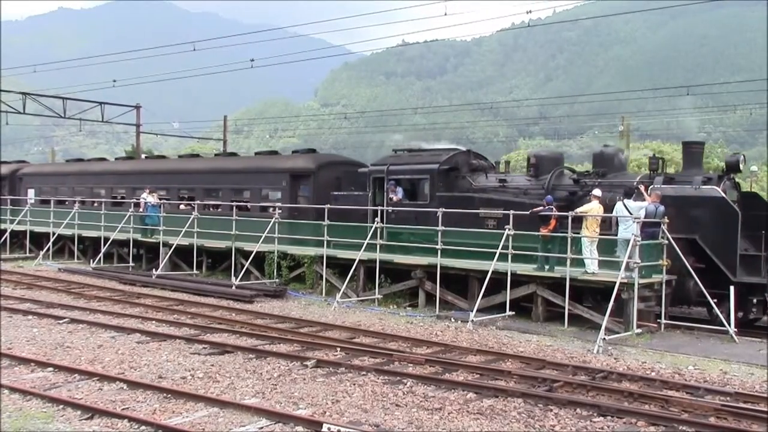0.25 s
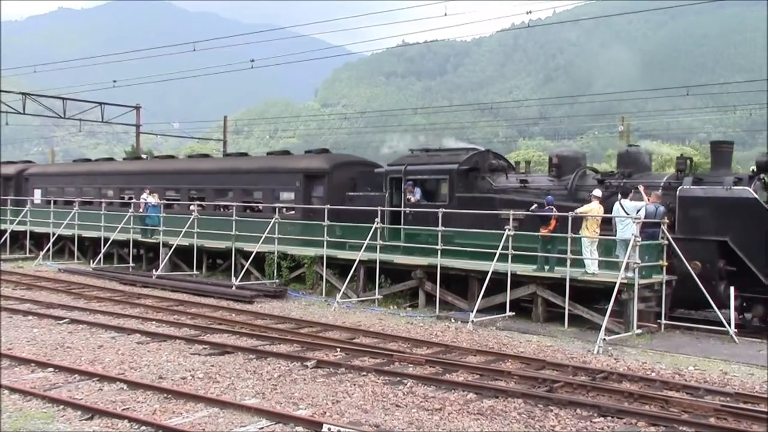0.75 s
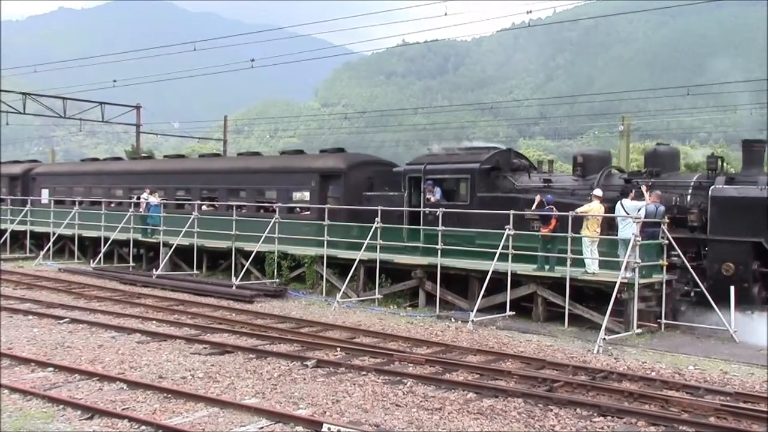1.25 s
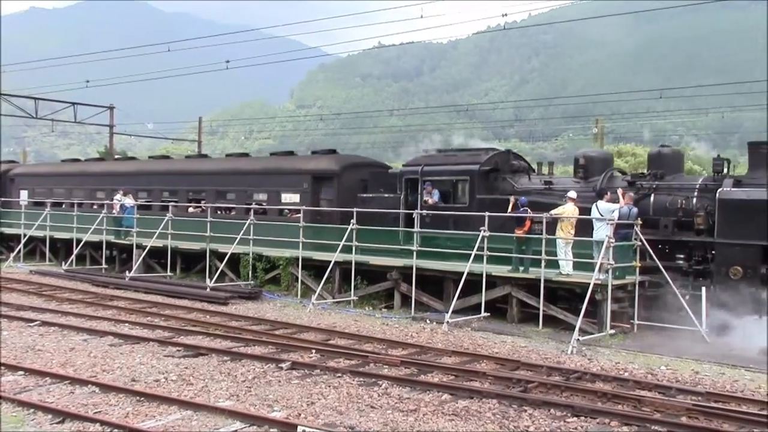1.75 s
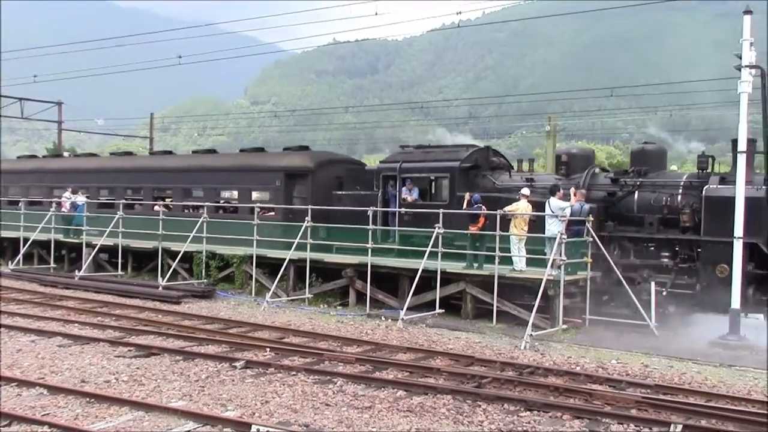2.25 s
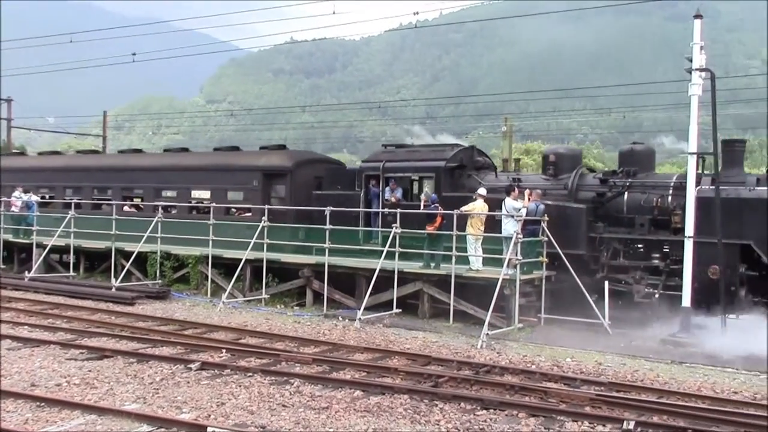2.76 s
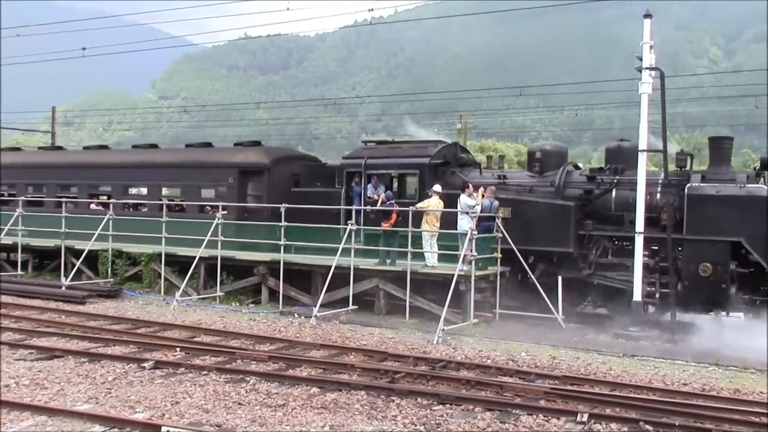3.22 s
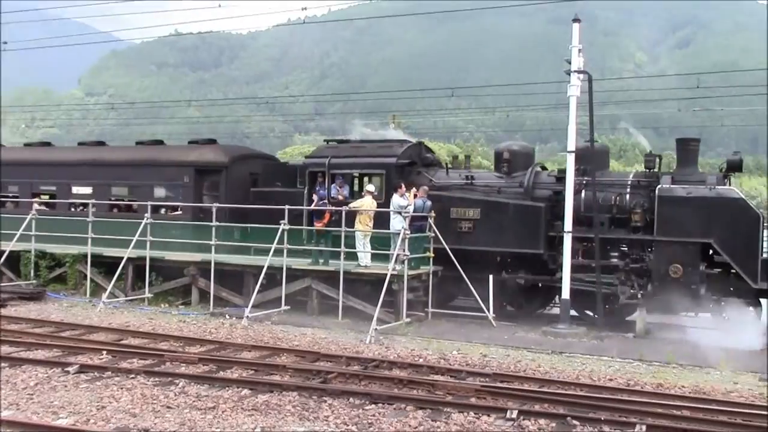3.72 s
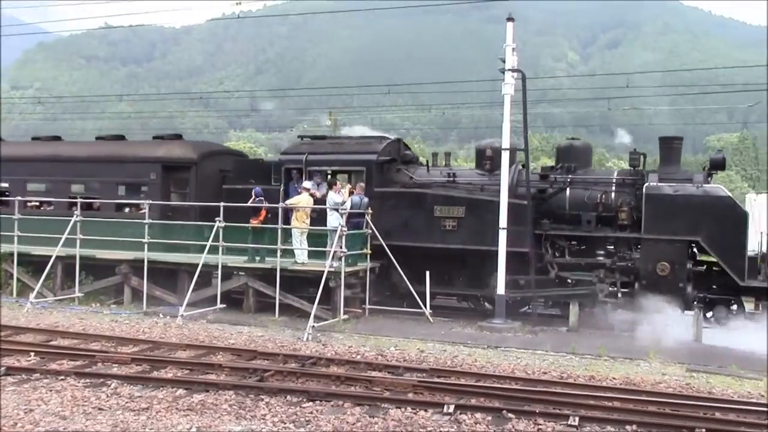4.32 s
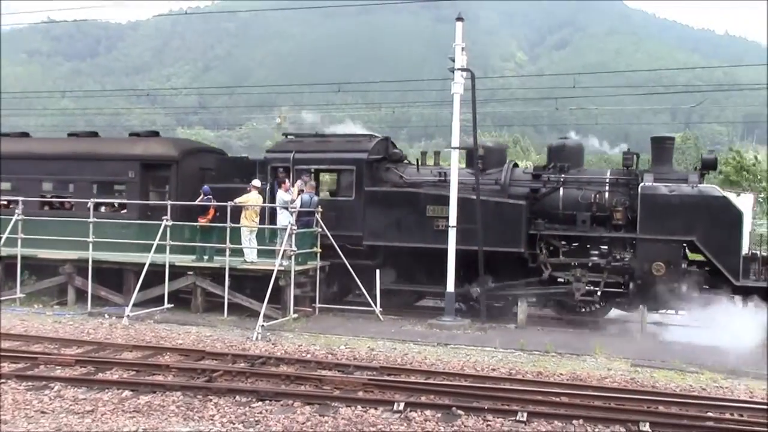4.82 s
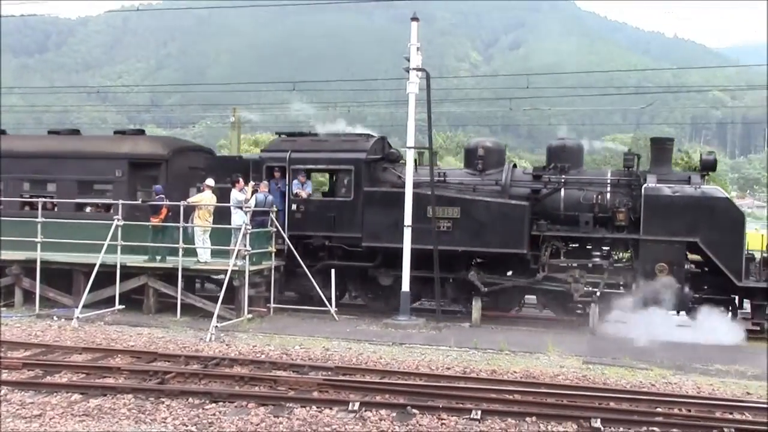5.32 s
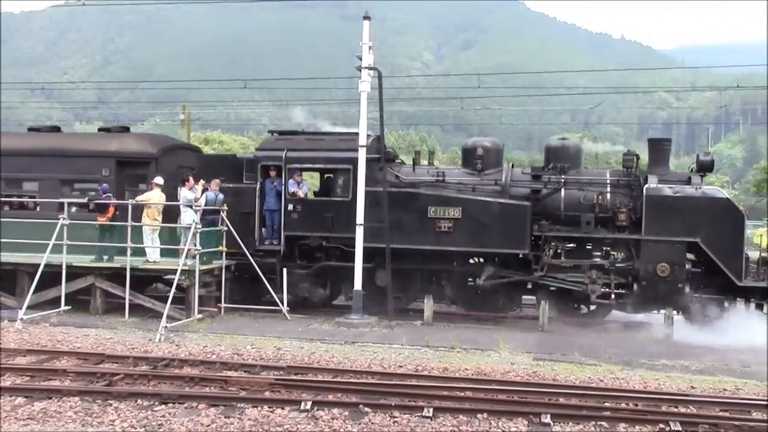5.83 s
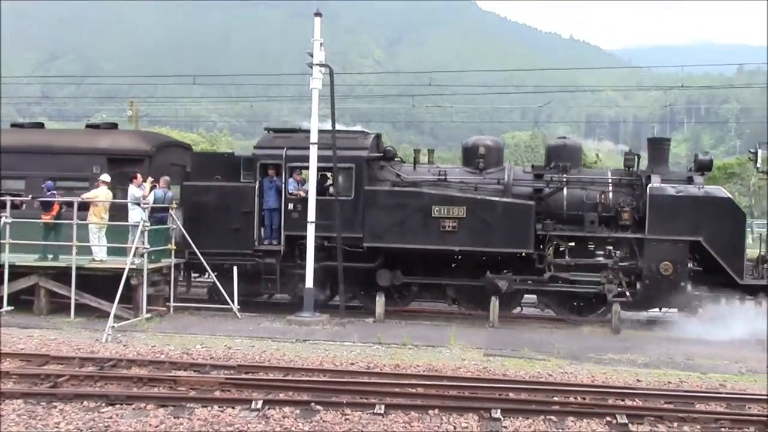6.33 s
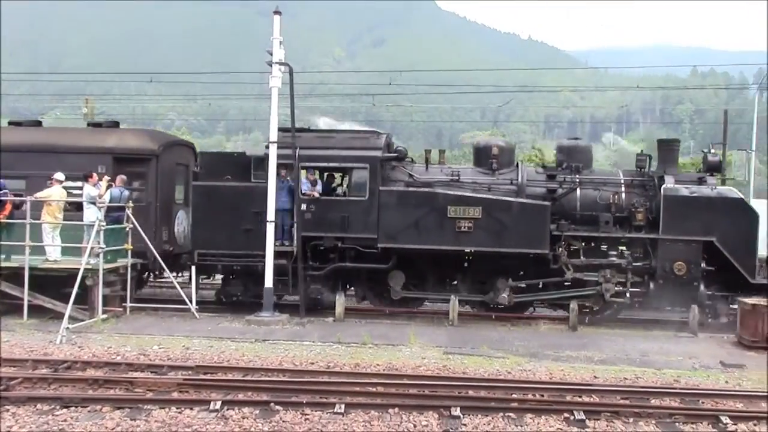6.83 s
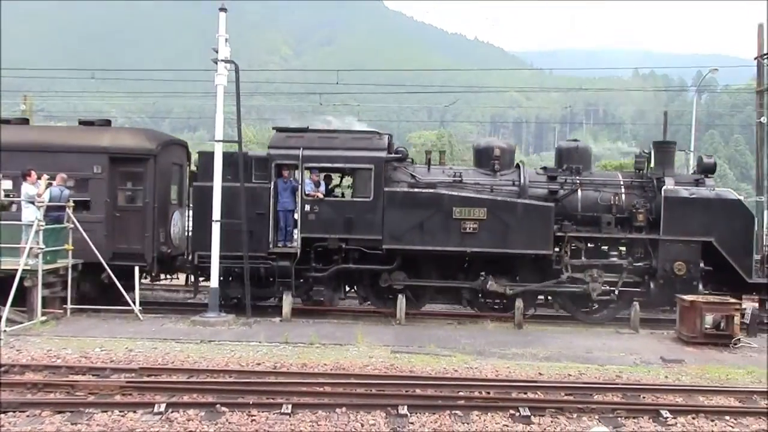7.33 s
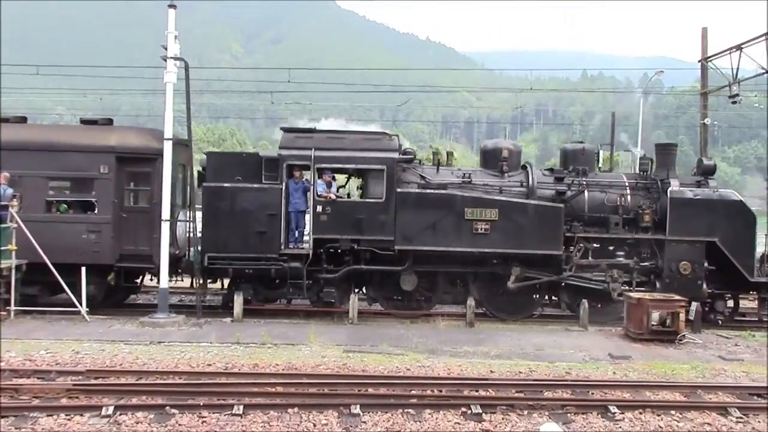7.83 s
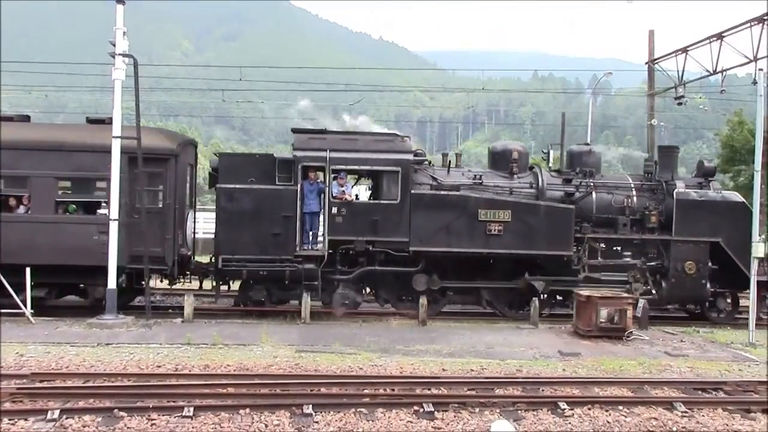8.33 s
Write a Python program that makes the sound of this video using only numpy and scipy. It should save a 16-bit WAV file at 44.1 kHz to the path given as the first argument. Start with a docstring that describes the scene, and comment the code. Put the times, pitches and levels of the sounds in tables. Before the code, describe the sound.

Lumpy, fluttering gusts hit an unprotected stereo microphone for the first second or so, with sizzling high steam behind. Bright steam jets suddenly burst out and dominate for five seconds, surging slowly and sputtering as water is thrown out, with close reflections colouring the hiss. They stop sharply with a spit. Loose running gear knocks and squeaks softly over low rumble, the leak rises again, and wind returns.

```python
"""A steam locomotive pulls slowly out of a station. First hard gusts of wind buffet the microphone, as shaped
noise, over a thin leak of high noise and the rumble of the wheels. Then the open drain cocks blow: four bands
of noise hiss with every piston stroke and roar while they throw out water, and the leak sinks. The cocks shut
with a last spit; the leak comes back with a faint sine whistle, and the running gear clanks as damped partials
and squeaks as wavering sines. Near the end the wind gusts again."""
import sys
import numpy as np
from scipy import signal
from scipy.fft import rfft, irfft, next_fast_len
from scipy.io import wavfile
from scipy.ndimage import uniform_filter1d, map_coordinates

SR = 44100
rng = np.random.default_rng(int(sys.argv[2]) if len(sys.argv) > 2 else 0)


def int16_out(signal):
    """Quantize to a 16-bit WAV file."""
    q = np.round(np.clip(np.atleast_2d(signal).T, -1, 1) * 32767)
    wavfile.write(sys.argv[1], SR, q.astype(np.int16))


N = 377937


def amp(db):
    """Decibels to gain."""
    return 10 ** (np.asarray(db) / 20)


def unit(x):
    """Scaled to rms 1."""
    return x / np.sqrt(np.mean(x ** 2) + 1e-20)


def along(points, hz):
    """A curve through (f/Hz, value) points, on a log frequency axis."""
    f, v = np.transpose(points)
    return np.interp(np.log(hz + 1), np.log(f + 1), v)


def clock():
    """The time of every sample, in seconds."""
    return np.arange(N) / SR


def curves(rows):
    """One value per sample for each column after the time."""
    s, *cols = np.transpose(rows)
    return [np.interp(clock(), s, c) for c in cols]


def gate(start, end, edge):
    """Open from start to end, with soft edges."""
    return (np.tanh((clock() - start) / edge) - np.tanh((clock() - end) / edge)) / 2


def swell(start, rise, hold, fall):
    """Rises from start, holds until start + hold, then dies away."""
    age = clock() - start
    return np.clip(age / rise, 0, 1) * np.exp(-np.maximum(age - hold, 0) / fall)


def wobble(rate):
    """A smooth random curve, rate knots a second."""
    return map_coordinates(rng.standard_normal(int(N * rate / SR) + 4), [clock() * rate])


def filtered(x, response):
    """x times a response of frequency."""
    m = next_fast_len(N + 8192)
    return irfft(rfft(x, m) * response(np.fft.rfftfreq(m, 1 / SR)), m)[..., :N]


def drone(spectrum):
    """Noise of rms 1, the same in both ears."""
    return unit(filtered(rng.standard_normal(N), lambda hz: amp(along(spectrum, hz))))


# stereo width given to the hiss, centred below about 5 kHz and wider in the treble, before any change of width:
# (f/Hz, side against middle level/dB)
WIDTH = [(4500, -90), (5300, -9.5), (6200, -19), (8000, -16), (10000, -12), (13500, -4.5), (15500, -20)]


def rush(spectrum, patchy_db, width_db=0):
    """Turbulent stereo noise of rms 1: eddies lift and drop patches of the spectrum."""
    z = signal.stft(rng.standard_normal((2, N)), nperseg=512)[2]
    field = rng.standard_normal(z.shape[1:])
    field = uniform_filter1d(field, size=9, axis=0)  # smooth across frequency
    field = uniform_filter1d(field, size=14, axis=1)  # smooth across time
    pair = signal.istft(z * amp(patchy_db * unit(field)), nperseg=512)[1][:, :N]

    def middle_and_side(hz):
        middle_db = along(spectrum, hz)
        return amp([middle_db, middle_db + along(WIDTH, hz) + width_db])

    mid, side = filtered(pair, middle_and_side)
    return unit(np.array([mid + side, mid - side]))


# hard gusts: (start t/s, end t/s, edge t/s, buffet level/dB, flutter level/dB)
GUSTS = [(-.02, 0.128, .016, -13.5, -12.5), (0.165, 0.203, 0.0089, -14.5, -20.5),
         (0.223, 0.284, 0.019, -18, -25.5), (0.324, 0.608, .015, -18.5, -28),
         (0.401, 0.483, 0.0071, -23, -20), (0.57, 0.59, .006, -12.5, -13), (0.775, 0.836, 0.011, -18, -30),
         (0.798, 1.242, 0.0085, -22, -37), (1.047, 1.135, .015, -16, -29), (8.17, 8.56, .06, -26, -26.5),
         (8.308, 8.423, 0.07, -20, -15.5)]
# light air on the microphone, before trim: (t/s, buffet level/dB)
BREEZE = [(1.25, -32), (1.29, -27), (1.61, -49.5), (1.79, -36), (2.23, -29.5), (2.4, -41.5), (2.44, -55),
          (2.57, -36.5), (2.84, -47), (3.34, -49), (3.54, -39), (4.09, -40.5), (4.44, -49.5), (4.96, -50.5),
          (5.11, -39.5), (5.15, -45.5), (5.49, -44), (6.09, -56), (6.13, -39), (6.36, -55.5), (6.67, -58),
          (6.71, -48), (6.84, -42.5), (7.13, -60.5), (7.3, -33), (7.36, -42.5), (7.71, -42.5),
          (7.82, -33.5), (7.9, -38), (8.15, -30)]
# single strong eddies slap the microphone: (start t/s, buffet level/dB)
SLAPS = [(.364, -18), (.407, -16.5), (.431, -12), (.526, -10), (.884, -19), (1.16, -17), (1.181, -15)]
# wind noise colours, relative: (f/Hz, level/dB per Hz)
BUFFET = [(25, -46), (60, -49), (100, -26), (160, -9.5), (240, -1), (360, 3.5), (550, 2), (750, -2),
          (1100, -11.5), (2000, -31), (4000, -70)]
FLUTTER = [(200, -53), (450, 0), (750, -1), (1050, -2), (1500, -6), (2200, -11.5), (3200, -19), (6000, -34)]
TEARING = [(500, -35), (1000, -2), (1600, 3), (2400, 4), (3200, -7), (5000, -33)]
LULL_DB = -34.5  # buffet between the first gusts
BREEZE_DB, BREEZE_FROM_S = 0.5, 1.22  # trim of the light air, and when it takes over from the lull
SLAP_FLUTTER_DB = -9.5  # flutter against buffet in a slap


def wind():
    """Eddies hit the microphone in lumps; hard gusts break into sharp flutter."""
    t = clock()
    buffet = np.where(t < BREEZE_FROM_S, amp(LULL_DB), amp(curves(BREEZE)[0] + BREEZE_DB))
    flutter = np.zeros(N)
    for start, end, edge, gust_db, flutter_db in GUSTS:
        blowing = gate(start, end, edge)
        buffet = np.hypot(buffet, amp(gust_db) * blowing)
        flutter = np.hypot(flutter, amp(flutter_db) * blowing)
    eddies = 0.43 * wobble(75) + 0.83 * wobble(190)
    # lumps deepen as the wind grows, then merge into one roar in the hardest gusts
    depth_db = np.interp(20 * np.log10(buffet), [-40, -22, -13], [2.1, 3.1, 1.5])
    push = buffet * unit(amp(depth_db * eddies))
    crackle = flutter * unit(amp(0.92 * depth_db * eddies + 2.0 * wobble(500)))
    age = t[:SR // 20]
    slap = age / 0.0038 * np.exp(1 - age / 0.0034)
    for s, db in SLAPS:
        first = round(s * SR)
        at = slice(first, first + len(age))
        push[at] += amp(db) * slap
        crackle[at] += amp(db + SLAP_FLUTTER_DB) * slap
    # hard gusts also tear at each port separately, and brighter
    tearing = amp(-10.5) * flutter * np.array([drone(TEARING), drone(TEARING)])
    return push * drone(BUFFET) + crackle * (drone(FLUTTER) + tearing)


# the uneven leak, heard before and after the jets, before trim:
# two lists of (t/s, hiss level/dB, fizz level/dB)
LEAK = [
    [(0.0, -24, -24), (0.038, -28.5, -30), (0.142, -26, -21.5), (0.232, -26, -26), (0.444, -21, -18),
     (0.664, -22, -20), (0.734, -18.5, -16), (1.134, -27, -26), (1.25, -20, -23.5)],
    [(6.55, -49, -49), (7.07, -48, -37), (7.22, -36, -34.5), (7.6, -32.5, -29.5), (7.7, -33, -33),
     (7.79, -28.5, -25), (7.85, -31.5, -31), (7.93, -29, -26.5), (8.57, -26.5, -25.5)],
]
# the leak's thin whistle: (t/s, level/dB)
WHISTLE = [(6.5, -60), (6.85, -53), (7.13, -47.5), (7.34, -46.5), (7.5, -51), (8.57, -53)]
# leak noise colours, relative: (f/Hz, level/dB per Hz)
LEAK_HISS = [(900, -19), (1800, -12), (2800, -4.5), (3300, -3.5), (3650, -1), (4100, -4.5), (5000, -7.5),
             (5700, -1), (6400, 1), (8200, 1), (9500, -8), (12000, -33)]
LEAK_FIZZ = [(7000, -30), (9000, -2.5), (10000, 0), (11000, -2.5), (12300, -6), (13500, -12),
             (16000, -16.5)]
LEAK_HISS_DB, LEAK_FIZZ_DB = 0.5, 1.5  # trim of its two parts
LEAK_LEAST_DB = -38.5  # floor under each part, before the wobble and the jets' dip


def leak():
    """A thin, high hiss from the engine's valves, which drops while the cocks blow; a gap in it whistles."""
    hiss_db, fizz_db = curves(np.vstack(LEAK))
    whistle_db, = curves(WHISTLE)
    least = amp(LEAK_LEAST_DB)
    hiss_gain = np.hypot(amp(hiss_db + LEAK_HISS_DB), least)
    fizz_gain = np.hypot(amp(fizz_db + LEAK_FIZZ_DB), least) * amp(1.2 * wobble(25))
    hiss = hiss_gain * rush(LEAK_HISS, patchy_db=1, width_db=-37)
    fizz = fizz_gain * rush(LEAK_FIZZ, patchy_db=1.3, width_db=-8.5)
    pitch_hz = 3620 * (1 + .006 * wobble(200))
    whistle = unit(np.sin(2 * np.pi * np.cumsum(pitch_hz) / SR) * amp(2 * wobble(90)))
    dip = 1 - 0.95 * gate(1.29, 6.45, .02)
    return amp(0.72 * wobble(18)) * (hiss + fizz) * dip + amp(whistle_db) * whistle


# rumble colour, relative: (f/Hz, level/dB per Hz)
WHEELS = [(25, -40), (70, -26), (120, -9.5), (250, -12), (450, -9), (900, 3), (1500, 6), (2500, 3),
          (5000, -9.5)]
# short squeaks of the rods: (t/s, length t/s, f/Hz, level/dB)
SQUEAKS = [(0.465, 0.022, 1600, -22), (7.285, 0.07, 1695, -41), (7.33, 0.04, 1960, -38),
           (7.76, .03, 2150, -36)]
# knocks of the running gear: (t/s, level/dB, t60 t/s)
CLANKS = [(6.715, -41.5, 0.35), (7.005, -37.5, 0.24), (7.225, -37.5, 0.65), (7.29, -39, 0.4),
          (7.765, -31.5, 0.31), (7.81, -32.5, 0.19), (8.045, -29.5, 0.2)]
# partials of the steel, before a random lift at each knock: (f/Hz, level/dB, share of t60)
STEEL = [(718, 1, 0.86), (1070, -2, 0.76), (1447, -2, .9), (1790, -6, 0.73), (2120, -7, .7), (2550, -1, .6),
         (3530, -5, 0.46)]
WHEELS_DB, NEARING_DB_PER_S = -48.5, .5  # the rumble at the start, and its growth as the wheels come near


def running_gear():
    """Wheels rumble; loose rods knock, shake the frame, ring and squeak."""
    rumble_db = WHEELS_DB + NEARING_DB_PER_S * clock() + 1.3 * wobble(9.5)
    out = amp(rumble_db) * drone(WHEELS)
    # the frame's rattle: (f/Hz, level/dB per Hz)
    rattle = drone([(50, -25), (110, -2), (250, -4.0), (600, 7), (2000, 3.5), (4000, -23), (10000, -19)])
    age = clock()[:SR // 2]
    for s, db, t60 in CLANKS:
        first = round(s * SR)
        at = slice(first, first + len(age))
        ring = 0
        for hz, level, share in STEEL:
            partial_db = level + rng.normal(0, 3.7) - 60 * age / (t60 * share)
            ring = ring + amp(partial_db) * np.sin(2 * np.pi * hz * age)
        attack = 1 - np.exp(-age / 0.0032)
        out[at] += amp(db) * attack * (.5 * ring + amp(-60 * age / t60) * rattle[at])
    for s, length, hz, db in SQUEAKS:
        phase = 2 * np.pi * np.cumsum(hz * (1 + .011 * wobble(250))) / SR
        out += amp(db) * gate(s, s + length, 0.0088) * np.sin(phase)
    return out


# each piston stroke drives out a slug of water, then a dribble; holds count from the start:
# (start t/s, rise t/s, slug hold t/s, dribble hold t/s, slug level/dB, dribble level/dB, throat lift level/dB)
STROKES = [(1.259, 0.0099, .24, 1.08, -19.5, -33, 1), (2.59, 0.081, 0.13, 0.59, -21, -32.5, -0.5),
           (4.0, 0.073, 0.29, 0.45, -29, -38, 1.5), (5.31, .08, 0.36, 0.93, -26, -35.5, 0)]
SLUG_FALL_S, DRIBBLE_FALL_S = 0.089, 0.17  # how fast each dies away
SLUG_SAG_DB_PER_S = 6.5  # a slug thins as it drains
MIST_DB = -39.5  # the spray that never stops, before the roar's trim


def water_db():
    """Water in the jets, which sets their roar: a slug and a dribble at every stroke, over a steady mist."""
    power = amp(MIST_DB) ** 2
    for s, rise, slug, dribble, slug_db, dribble_db, _ in STROKES:
        sag_db = SLUG_SAG_DB_PER_S * np.maximum(clock() - s - rise, 0)
        power = power + (amp(slug_db - sag_db) * swell(s, rise, slug, SLUG_FALL_S)) ** 2
        power = power + (amp(dribble_db) * swell(s, rise, dribble, DRIBBLE_FALL_S)) ** 2
    return 10 * np.log10(power)


def throat_lift_db():
    """Each stroke voices the jets' throat a little differently."""
    return sum(db * gate(s, s + dribble, .03) for s, _, _, dribble, _, _, db in STROKES)


# steam flow through the drain cocks, before its random surge: (t/s, level/dB)
JET = [(1.27, -16), (1.3, -15), (1.44, -19.5), (1.56, -13.5), (1.77, -22.5), (1.8, -13), (1.9, -20.5),
       (2.24, -15), (2.33, -11.5), (2.55, -22.5), (2.69, -13), (3.24, -16.5), (3.32, -15), (3.39, -21.5),
       (3.44, -18), (3.64, -20.5), (3.89, -19.5), (3.97, -23), (4.27, -13.5), (4.32, -18), (4.54, -16.5),
       (4.58, -22), (4.68, -14.5), (4.85, -27), (4.91, -23), (5.31, -20), (5.4, -15), (5.76, -12),
       (6.03, -19), (6.23, -12.5), (6.36, -20.5), (6.42, -26)]
# the cocks snap shut, before the trim of each part: (t/s, length t/s, level/dB)
SPIT = (6.431, 0.034, -13.5)
# jet noise colours, relative: (f/Hz, level/dB per Hz)
HISS = [(3500, -61), (5000, -13.5), (5600, -10), (6100, -2), (6900, -2), (8000, -2), (9000, -4.5),
        (10500, -26.5), (13000, -42)]
FIZZ = [(7000, -54), (8800, -4.5), (9800, 2.5), (11000, 0), (12300, -2.5), (13500, -10), (16000, -15)]
THROAT = [(1500, -35.5), (2100, -13.5), (2480, -2.5), (2750, -2), (3100, -2), (3700, 1), (4300, -0.5),
          (5000, -5), (6200, -2.5), (8000, -42)]
ROAR = [(150, -40), (400, -20.5), (780, -6), (980, -7), (1200, -1.5), (1450, 1), (2000, 3.5), (2500, 1),
        (3200, 5.5), (5000, -43)]
HISS_DB, FIZZ_DB, THROAT_DB = -1, -5.5, -0.47  # parts of the jet against its flow
ROAR_DB = 1.5  # trim of the water's roar
SURGE_DB = 1  # random unsteadiness of the flow
THROAT_WET = 0.41  # share by which the throat follows the water instead of the flow
DRY_HZ, WET_HZ_PER_DB = 3930, 22  # the throat's centre in dry steam, and its drop as the roar grows
COLD_HZ, WARMING_S = 650, 1.4  # cold cylinders lower it further until they warm up


def drain_cocks():
    """Steam jets hiss and roar with a constant random sputter; the closing cocks give one short spit."""
    flow_db = curves(JET)[0] + SURGE_DB * wobble(16)
    roar_db = water_db()
    throat_db = THROAT_DB + flow_db + THROAT_WET * (roar_db - flow_db) + throat_lift_db()
    cold = np.exp(-np.maximum(clock() - STROKES[0][0], 0) / WARMING_S)
    centre_hz = DRY_HZ - WET_HZ_PER_DB * (roar_db - MIST_DB) - COLD_HZ * cold
    hiss = rush(HISS, patchy_db=1.9)
    fizz = rush(FIZZ, patchy_db=1.15)
    throat = rush(THROAT, patchy_db=1.75)
    roar = rush(ROAR, patchy_db=1.16)
    # drier steam shifts the throat's weight from its lower half to its upper half
    lower = filtered(throat, lambda hz: 1 / (1 + (hz / 3300) ** 8))
    shift_db = 7 * np.log2(centre_hz / 3350)
    throat = amp(-shift_db) * lower + amp(shift_db) * (throat - lower)
    jets = amp(flow_db) * (amp(HISS_DB) * hiss + amp(FIZZ_DB) * fizz)
    jets = jets + amp(throat_db) * throat + amp(roar_db + ROAR_DB) * roar
    blowing = gate(1.264, 6.425, .01)
    s, length, db = SPIT
    closing = gate(s, s + length, .004)
    spit_mix = amp(-4.5) * hiss + amp(-10.0) * throat + amp(-6.5) * fizz + amp(-16.0) * roar
    spit = amp(db) * closing * spit_mix
    last_steam = amp(-31) * gate(s + length, 6.5, .018) * (hiss + 0.84 * throat)
    sputter = unit(amp(0.37 * wobble(45) + 0.49 * wobble(260)))
    return sputter * (jets * blowing + spit + last_steam)


# paths off the ground, the tank and the platform: (delay at the start t/s, level/dB)
ECHOES = [(.0031, -23), (.0074, -17.5), (0.0115, -22.5), (0.0186, -20)]


def echoed(x, drift):
    """Near surfaces comb the hiss; the comb slides as the engine moves and the paths lengthen."""
    t, middle = clock(), x.mean(axis=0)
    out = x
    for delay, db in ECHOES:
        out = out + amp(db) * np.interp(t - delay * (1 + drift * t), t, middle)
    return out * np.std(x) / np.std(out)  # the overall level stays


# treble balance of the steam: (f/Hz, left against right level/dB)
LEAN = [(4800, 0), (6000, -0.3), (8000, 1.2), (12000, 0)]


def scene():
    """Echoing steam, wheels and wind: the steam's treble spreads and leans, the gusts' tearing spreads too."""
    steam = echoed(drain_cocks() + leak(), drift=0.0122)
    # half the lean goes to each ear, with opposite signs
    steam = filtered(steam, lambda hz: amp(np.outer([.5, -.5], along(LEAN, hz) * (hz > 4800))))
    return steam + wind() + running_gear()


LOW_CUT_HZ, TOP_HZ = 58, 15950  # the microphone's bass roll-off, and the band limit


def record(dry):
    """Full scale rounds off the highest peaks; the deepest bass is cut and nothing is kept above the band limit."""
    rounded = dry / (1 + dry ** 8) ** (1 / 8)
    return filtered(rounded, lambda hz: hz ** 2 / np.hypot(hz ** 2, LOW_CUT_HZ ** 2) * (hz < TOP_HZ))


dry = scene()
out = record(dry)
int16_out(out)
```